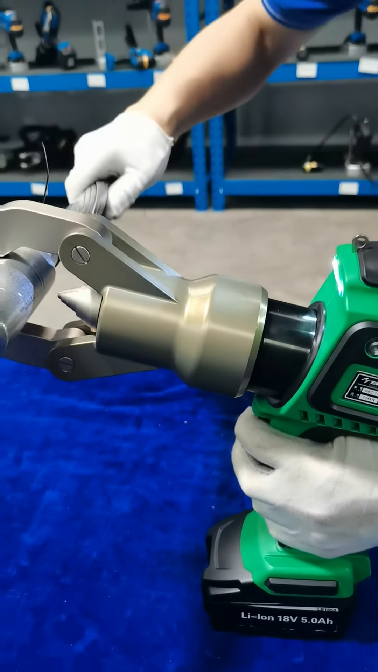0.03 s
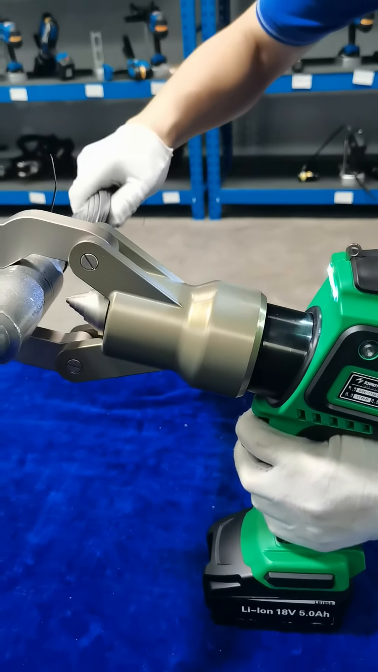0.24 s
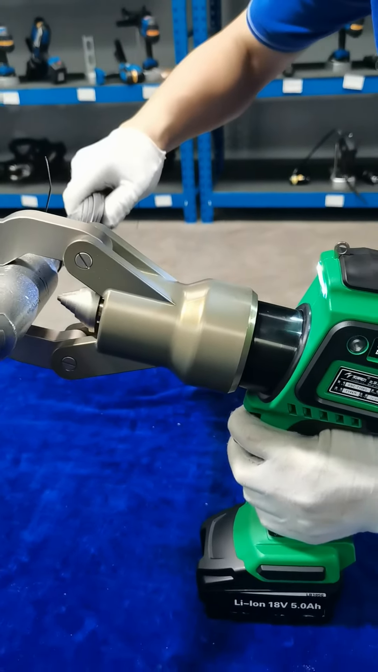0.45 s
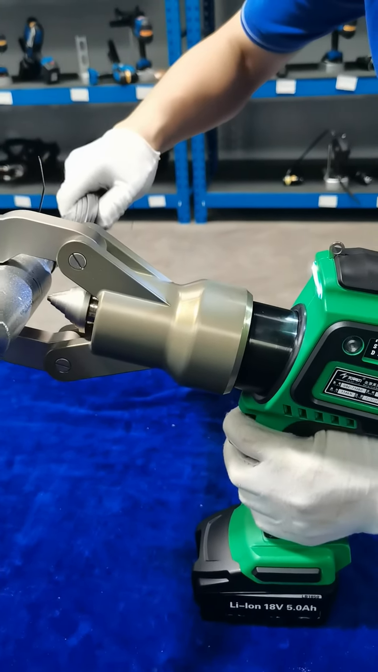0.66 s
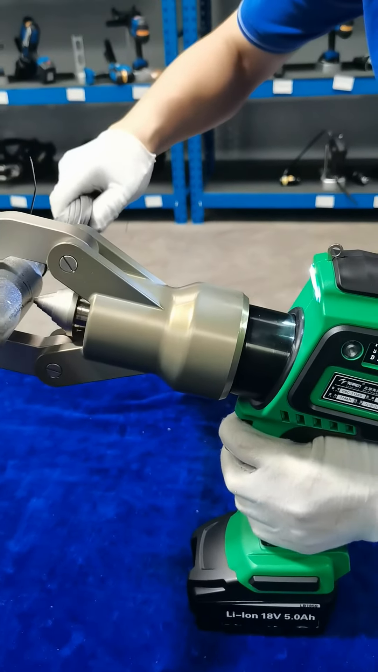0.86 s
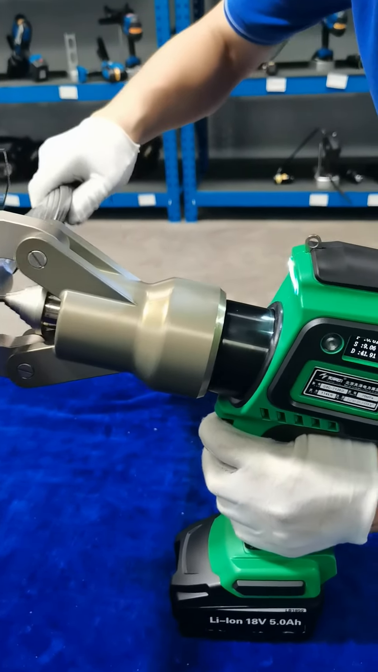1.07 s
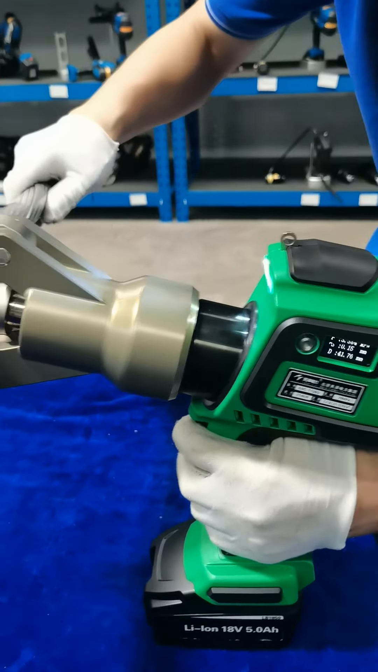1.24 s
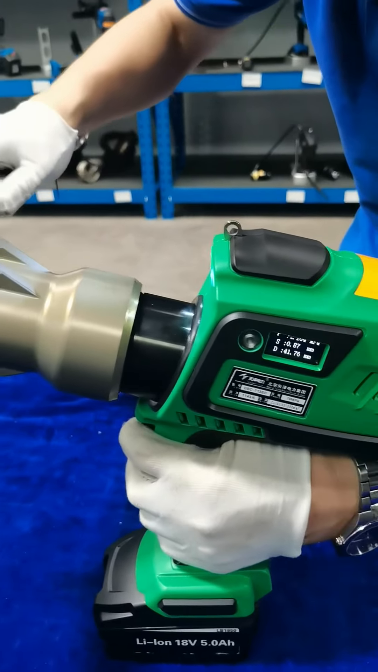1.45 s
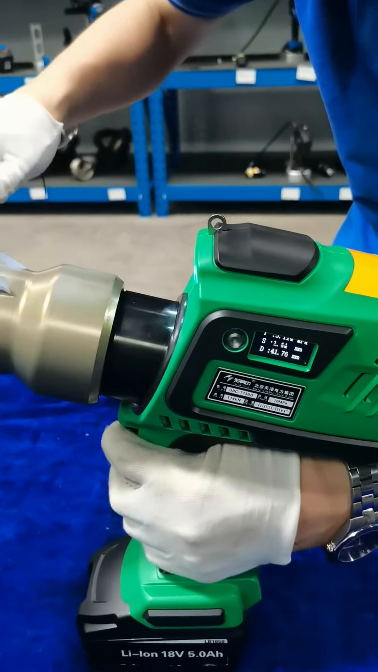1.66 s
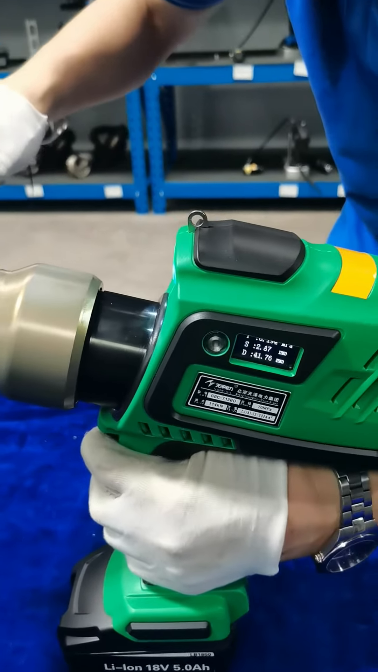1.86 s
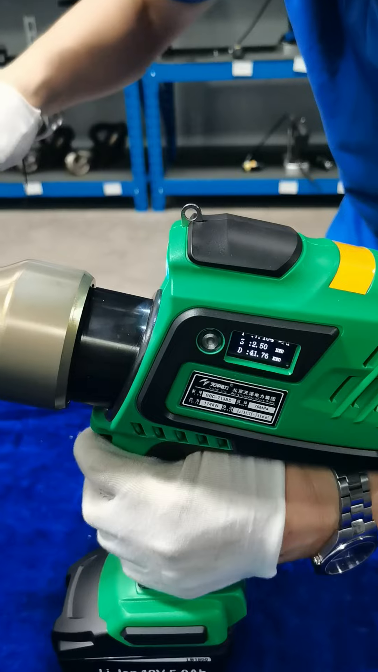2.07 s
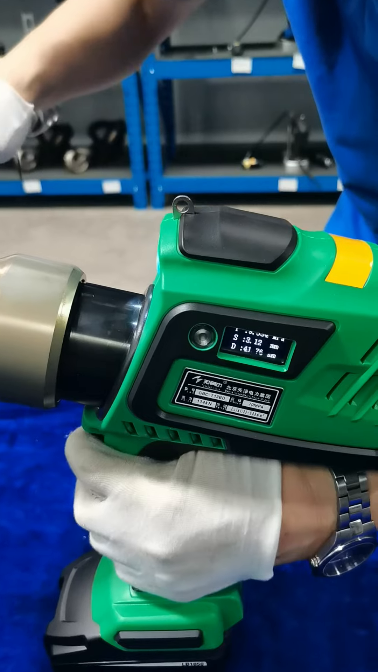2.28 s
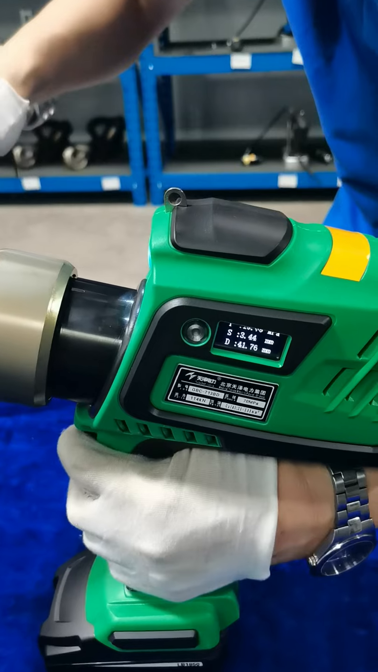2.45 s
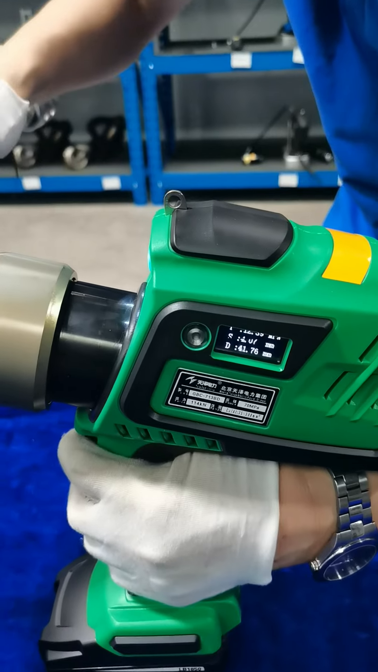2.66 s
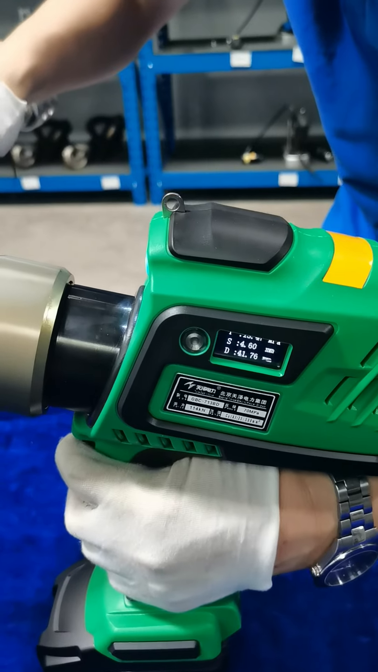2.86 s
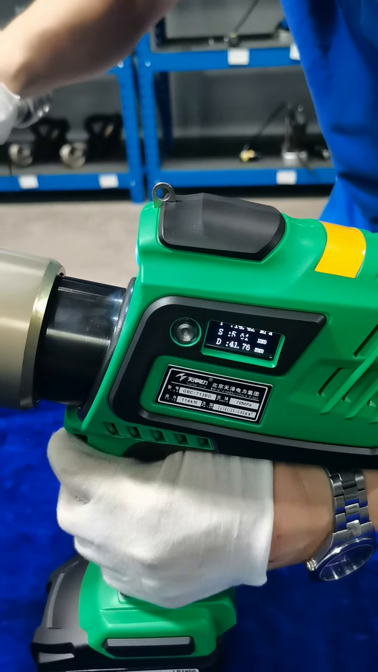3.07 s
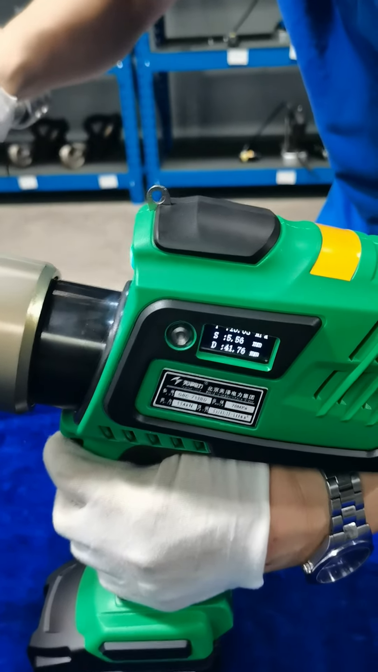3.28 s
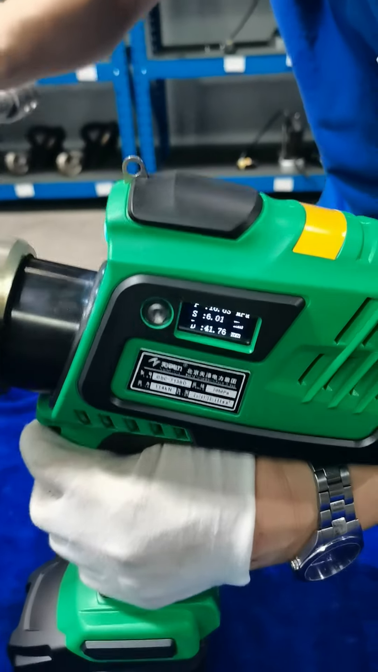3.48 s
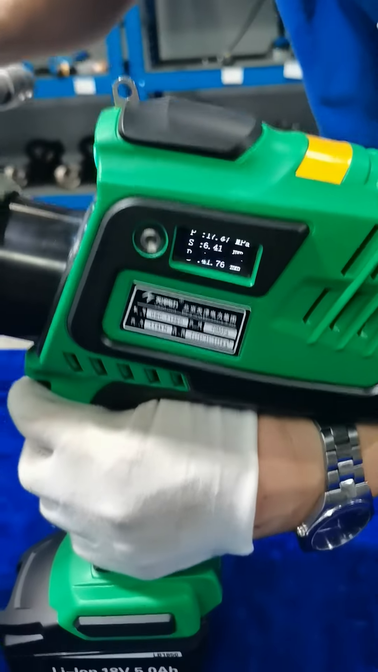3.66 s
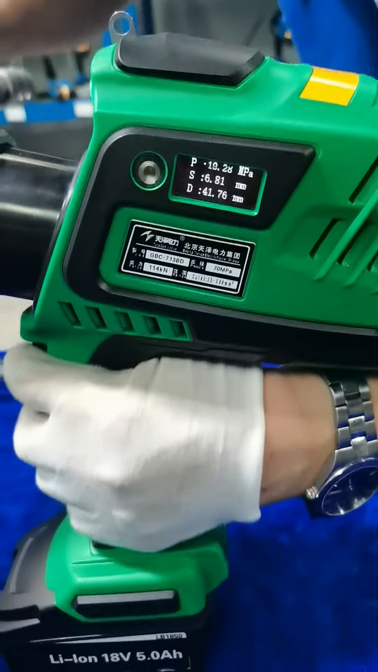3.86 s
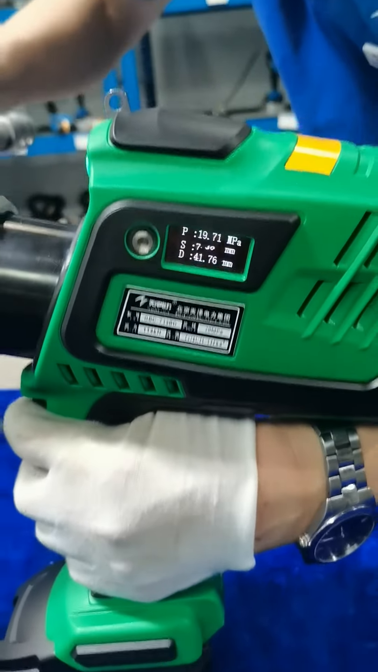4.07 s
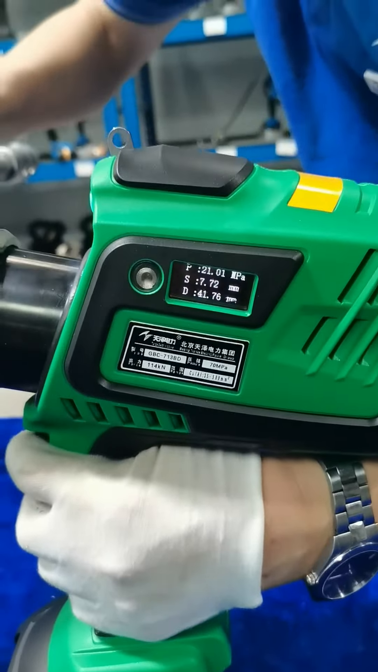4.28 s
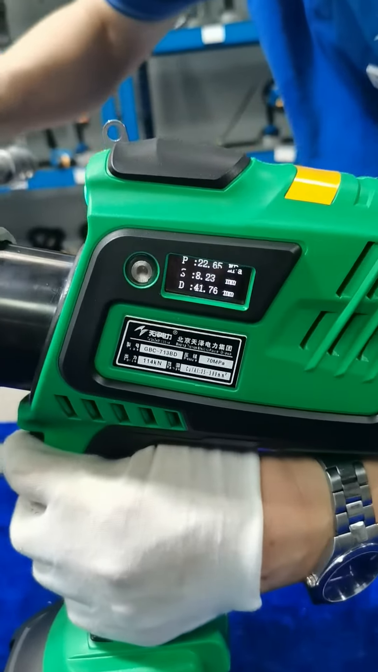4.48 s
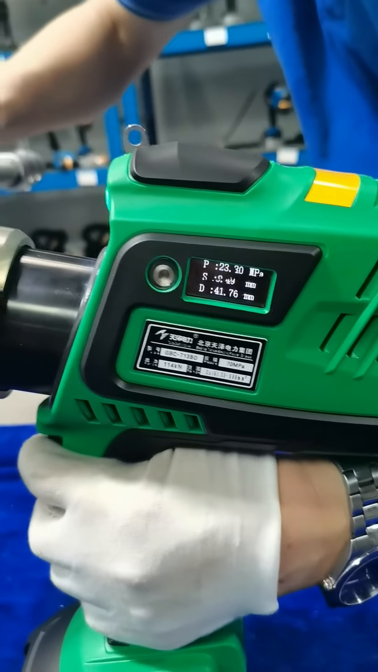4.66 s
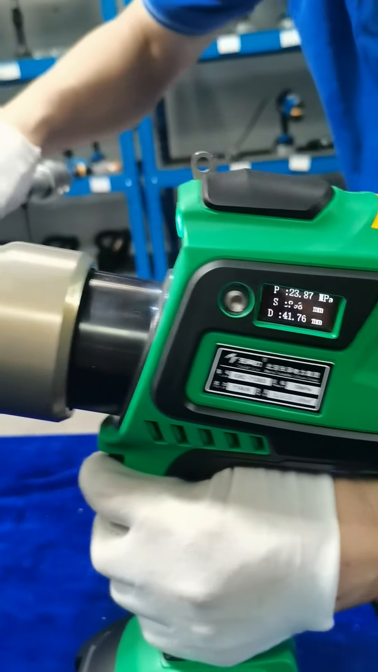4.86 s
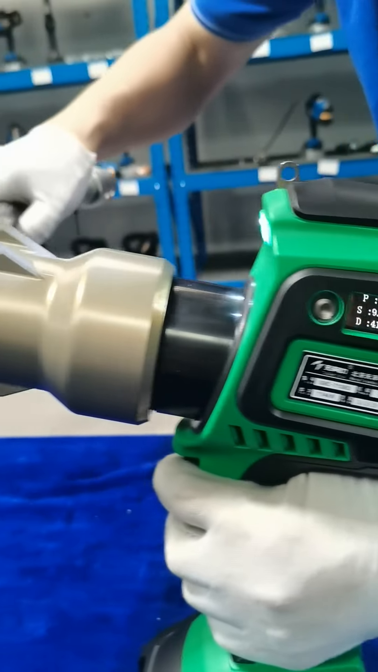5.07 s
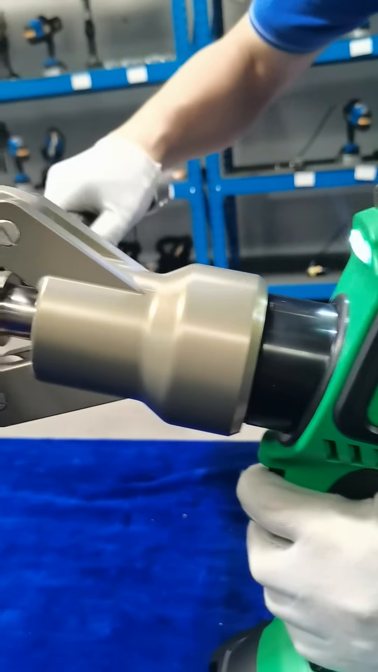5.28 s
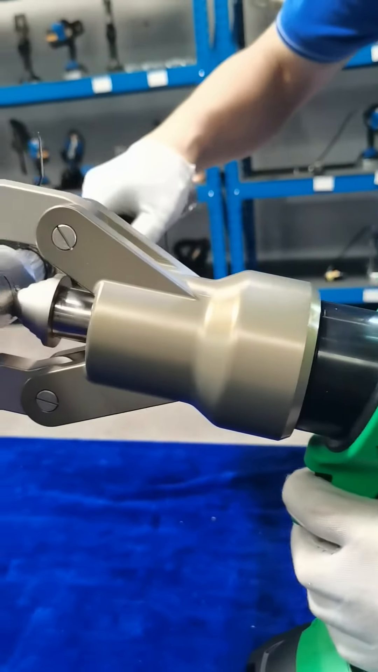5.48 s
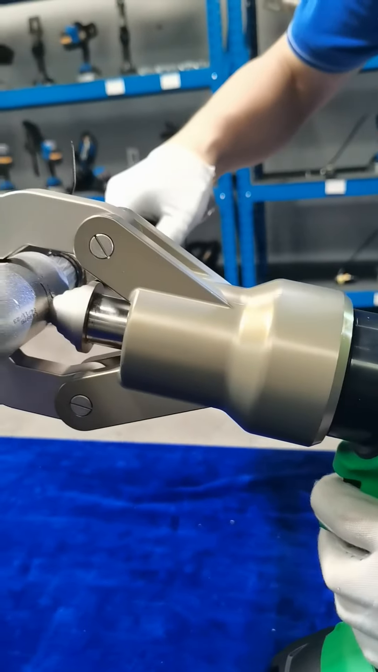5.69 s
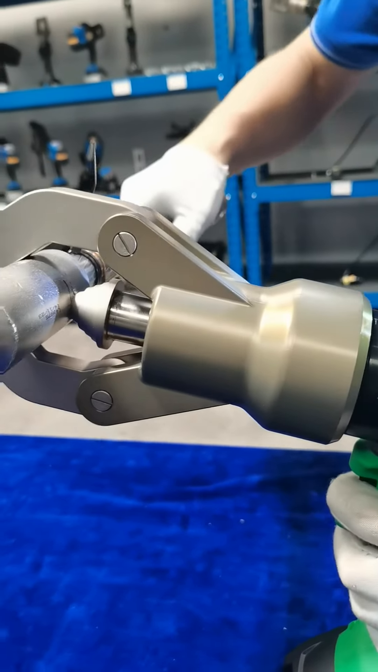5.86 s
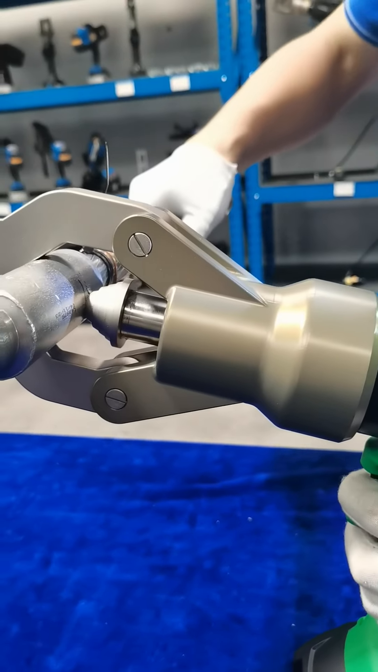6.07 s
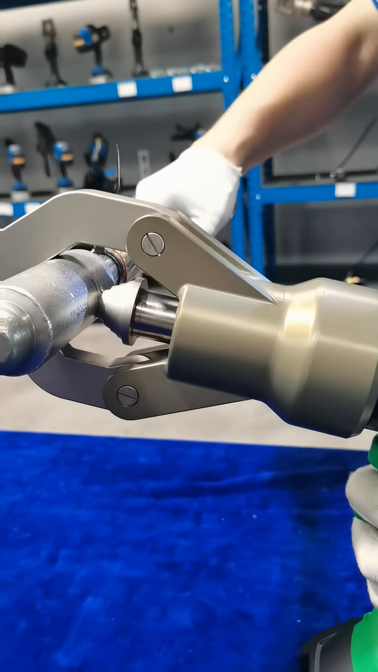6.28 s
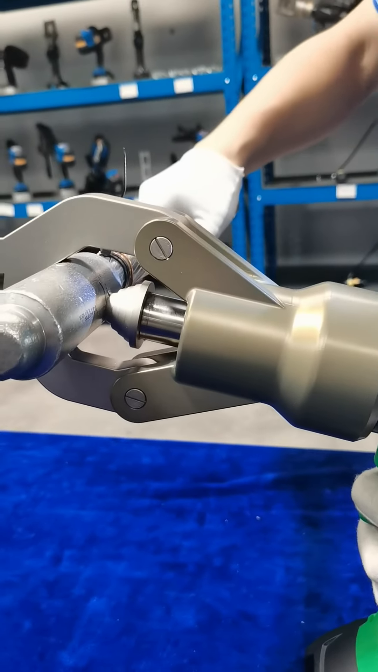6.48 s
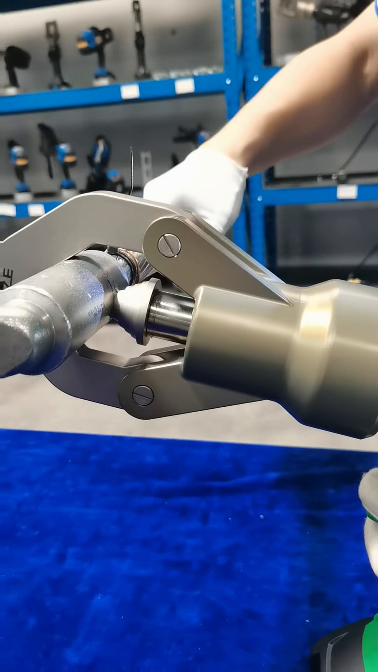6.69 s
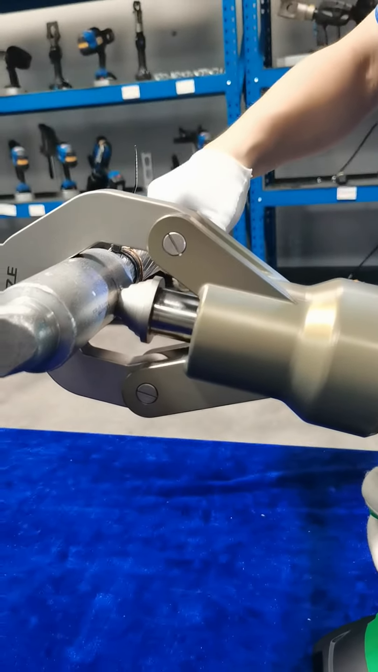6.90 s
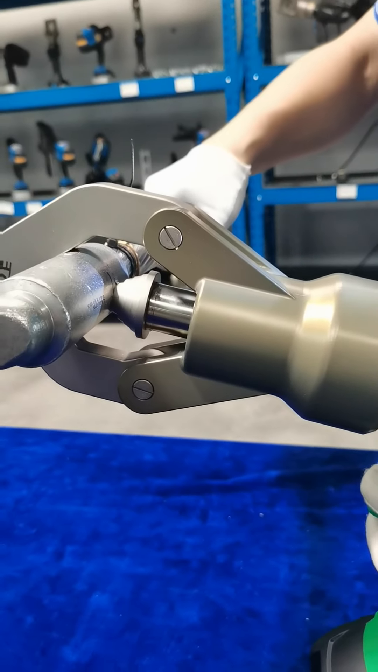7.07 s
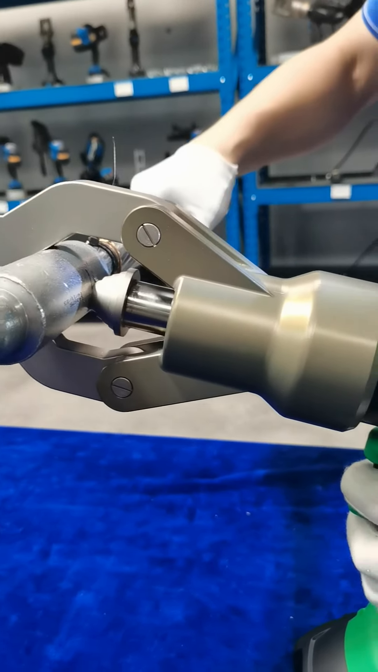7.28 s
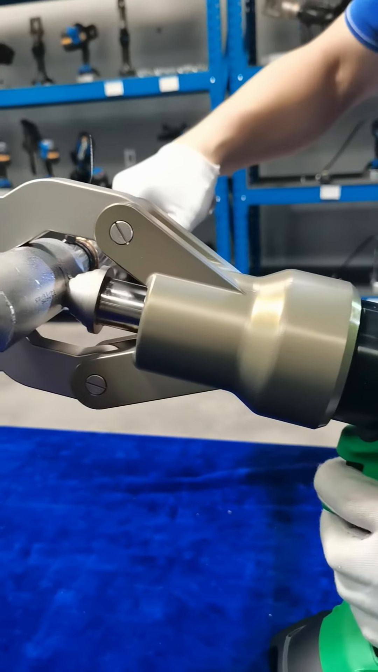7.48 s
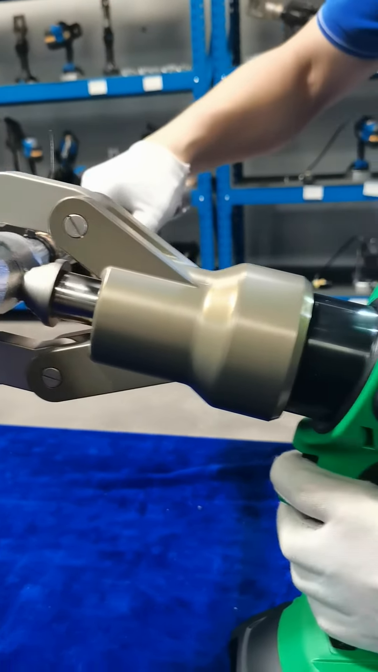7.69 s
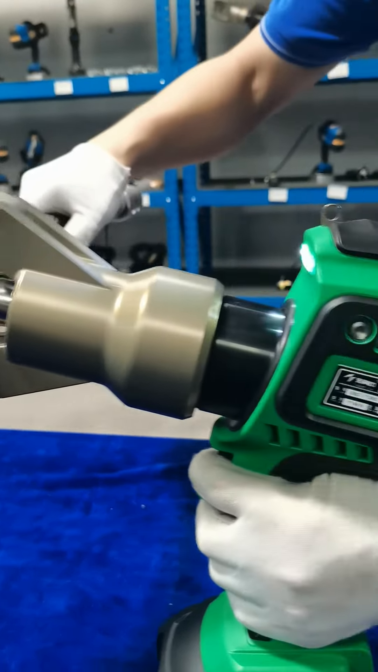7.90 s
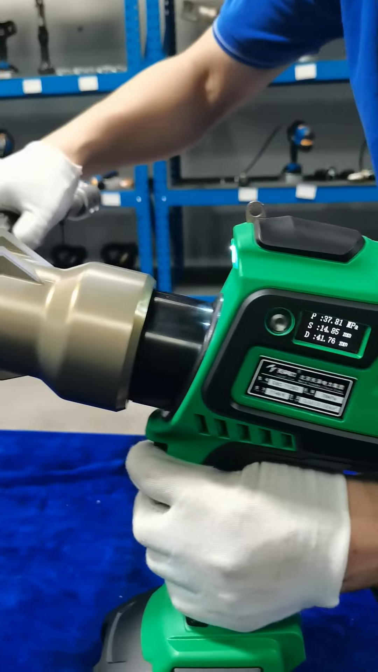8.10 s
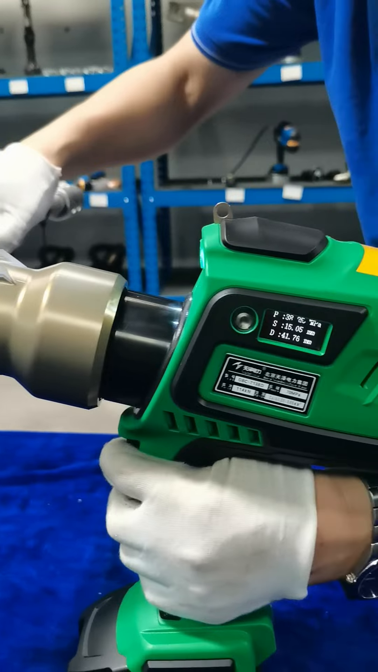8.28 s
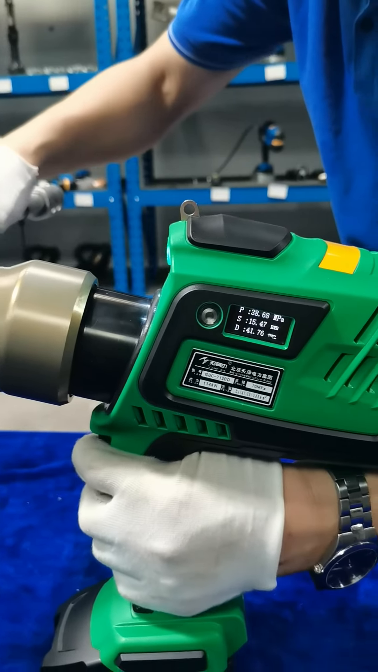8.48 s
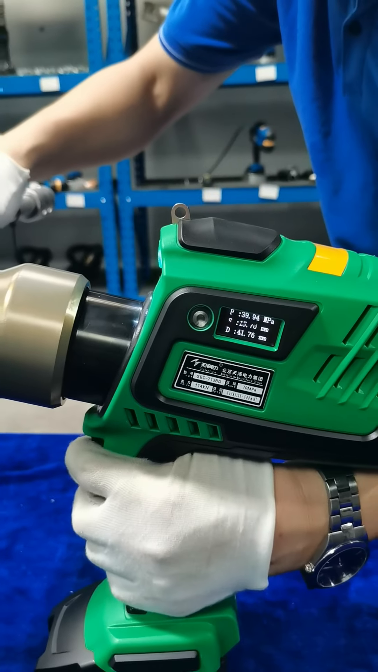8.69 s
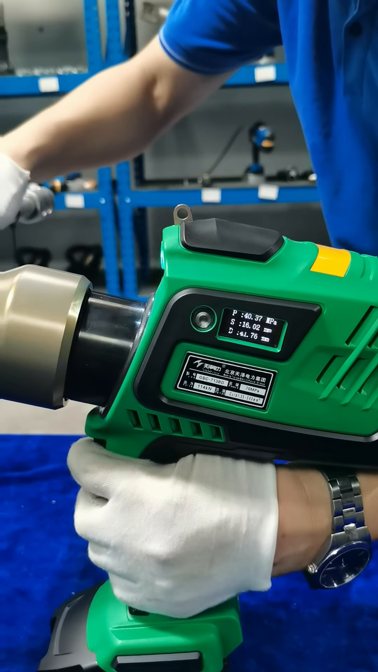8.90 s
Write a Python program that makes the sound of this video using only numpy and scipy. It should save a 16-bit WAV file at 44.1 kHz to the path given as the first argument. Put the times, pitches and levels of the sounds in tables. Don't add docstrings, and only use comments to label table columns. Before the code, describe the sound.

In a hard-walled workshop with low rumble, a soft trigger tick leads to a short rough metallic ring, then a battery hydraulic tool races up to a piercing whine. Pump strokes make it flutter about sixteen times a second, shallow at first, then deeper and grittier as pressure rises. Close microphone, short room echo, slight handling thumps; the motor is still running at the end.

```python
import sys
import numpy as np
from scipy import signal
from scipy.fft import rfft, irfft
from scipy.io import wavfile
from scipy.ndimage import uniform_filter1d

SR = 44100
rng = np.random.default_rng(int(sys.argv[2]) if len(sys.argv) > 2 else 0)


def to_wav(sig):
    pcm = np.clip(np.atleast_2d(sig), -1, 1) * 32767
    pcm = np.round(pcm).astype(np.int16)
    wavfile.write(sys.argv[1], SR, pcm.T)


def convert_level_to_amplitude(level_db):
    exponent = np.asarray(level_db, float) / 20
    return 10 ** exponent


N = 394254
TIME = np.arange(N) / SR
WHINE_MULTIPLE = 8

# [t/s, share of free speed 0-1, whine gain level/dB]
RUN_UP = [
    (.258, 0.02, -79),
    (.3, 0.14, -59),
    (.345, 0.44, -22),
    (.365, 0.53, -12),
    (.39, .6, -25),
    (.43, .69, -15),
    (.468, .81, -9),
    (.485, 0.94, -2),
    (.5, .95, 6),
]
# [t/s, free turns per second f/Hz, sag of the speed in a stroke 0-1]
SPEED = [(.5, 329.5, .045), (1.2, 329.5, .048), (1.9, 327.5, .058), (2.5, 327, .078), (3.0, 326.5, .11),
         (3.5, 326, .14), (4.0, 326, .158), (4.8, 326.5, .172), (5.4, 326, .2), (6, 325.5, .235),
         (7.4, 327.5, .25), (8.0, 327.5, .28), (8.94, 328.5, .28)]


def rms_one(x):
    return x / np.sqrt(np.mean(np.abs(x) ** 2) + 1e-20)


def in_time(rows):
    s, *columns = np.transpose(rows)
    return [np.interp(TIME, s, c) for c in columns]


def fades(events):
    coarse = TIME[::32]
    total_db = sum(gain_db * np.exp(-((coarse - s) / half_s) ** 4) for s, half_s, gain_db in events)
    return np.interp(TIME, coarse, total_db)


def slow(hz):
    r = np.exp(-2 * np.pi * hz / SR)
    settle = 9000
    wander = signal.lfilter([1], [1, -2 * r, r * r], rng.standard_normal(N + settle))
    return rms_one(wander[settle:])


def coloured(points):
    hz = np.maximum(np.fft.rfftfreq(N, 1 / SR), 1)
    point_hz, point_db = np.transpose(points)
    level_db = np.interp(np.log(hz), np.log(point_hz), point_db, left=-90, right=-90)
    return rms_one(irfft(rfft(rng.standard_normal(N)) * convert_level_to_amplitude(level_db), N))


def resonance(x, hz, width_hz):
    r = np.exp(-np.pi * width_hz / SR)
    top = np.array([1, 0, -1]) * (1 - r * r) / 2
    return signal.lfilter(top, [1, -2 * r * np.cos(2 * np.pi * hz / SR), r * r], x)


def twice(x, hz, width_hz):
    return rms_one(resonance(resonance(x, hz, width_hz), hz, width_hz))


def tone(turns, waver_hz, rough):
    rough = np.clip(rough, 0, 1)
    scatter = (slow(waver_hz) + 1j * slow(waver_hz)) / np.sqrt(2)
    wobble = np.sqrt(1 - rough) + np.sqrt(rough) * scatter
    return np.real(wobble * np.exp(2j * np.pi * turns))


def background():
    # [f/Hz, level/dB per Hz]
    rumble_colour = [(20, -30), (32, -15), (45, -2), (55, 5), (70, -3), (105, -4.5), (130, -10),
                     (190, -13.5), (260, -3)]
    # [f/Hz, level/dB per Hz]
    air_colour = [(220, 6), (500, -16), (1200, -20), (4000, -30), (8500, -42), (11000, -30), (15000, -27)]
    # [f/Hz, waver f/Hz, level/dB]
    room_tones = [
        (197, 6.7, -52),
        (810, 42, -66),
    ]
    # [t/s, half length t/s, rumble gain level/dB]
    handling = [
        (0.01, 0.058, 2),
        (.42, 0.088, 11),
        (1.1, 0.083, 10),
        (2.66, 0.085, 5),
        (5.2, .15, 6),
        (5.85, 0.088, 7),
        (6.35, 0.081, 5),
        (7.7, 0.27, 3.5),
        (4.4, 0.26, -10),
    ]
    rumble_db = -53.5 + 4.5 * np.tanh(slow(2.4)) + fades(handling)
    out = convert_level_to_amplitude(rumble_db) * coloured(rumble_colour) + convert_level_to_amplitude(-60.5) * coloured(air_colour)
    duck_db = -5 * in_time(RUN_UP)[0]
    for hz, waver_hz, level_db in room_tones:
        out += convert_level_to_amplitude(level_db + duck_db) * tone(hz * TIME, waver_hz, rough=0.69)
    return out


def workshop(x):
    t60_s = 0.5
    age = TIME[:SR // 2]
    echoes = rng.standard_normal(len(age)) * convert_level_to_amplitude(-60 * age / t60_s) * (age > .004)
    return signal.fftconvolve(x, echoes / np.sqrt(np.sum(echoes ** 2)))[:N]


def start_up():
    bites_s, attack_s = 0.2646, 0.0075
    lets_go_s, release_db_per_s = 0.41, 600
    tick_s, tick_length_s, tick_db = .09, .008, -54
    white = rng.standard_normal(N)
    held = np.clip((TIME - bites_s) / attack_s, 0, 1)
    held = held * convert_level_to_amplitude(-27.5 - np.clip(release_db_per_s * (TIME - lets_go_s), 0, 100))
    clutch = held * twice(white, 2420, 380)
    bright = twice(white, 6600, 1800) + 0.7 * twice(white, 10200, 1200)
    tick = convert_level_to_amplitude(tick_db) * np.exp(-((TIME - tick_s) / tick_length_s) ** 2) * bright
    return clutch + tick


def housing(x):
    # [f/Hz, width f/Hz, boost level/dB]
    shell_modes = [(1504, 140, 6), (2225, 700, 2), (2257, 16, 5.5), (2303, 116, -11), (2675, 110, -3.5),
                   (3020, 92, 7.5), (3686, 110, 4.5), (4217, 247, 5.5), (6260, 210, 2), (7630, 196, 8),
                   (8110, 180, 4), (9230, 470, -3.5), (9960, 610, 6.5), (11700, 550, 5)]
    for hz, width_hz, boost_db in shell_modes:
        x = x + (convert_level_to_amplitude(boost_db) - 1) * resonance(x, hz, width_hz)
    return x


def piston_load():
    # [t/s, strokes done]
    pump = [(.507, 0), (1.287, 13), (1.459, 16), (1.938, 24), (2.371, 31), (2.676, 36), (3.67, 52),
            (4.18, 60), (4.687, 68), (6.235, 92), (7.282, 108), (8.611, 128), (9.007, 134)]
    strokes = np.interp(TIME - .002, *np.transpose(pump))
    return np.sin(np.pi * strokes) ** 2


def many_modes(x, ripple_db, spacing_hz):
    hz = np.arange(N // 2 + 1) * SR / N
    ripple = np.interp(hz / spacing_hz, np.arange(600), rng.standard_normal(600))
    crowded = np.clip(hz / 4500, .25, 1)
    return rms_one(irfft(rfft(x) * convert_level_to_amplitude(ripple_db * ripple * crowded), N))


def gears(load):
    # [f/Hz, level/dB per Hz]
    gear_colour = [(300, -18), (520, -9), (700, 0.5), (1150, 7), (1900, -4), (2400, 5.5), (2800, -8.5),
                   (4150, 1.5), (4900, -1.5), (7700, -2), (8900, -10), (10300, -7), (13000, -13.5),
                   (15750, -5.5)]
    # [t/s, level/dB]
    nearness = [(.5, -2), (.7, -3.5), (1.4, -1.5), (2.6, 1.5), (3.4, 1.5), (3.8, 3.5), (4.6, 4), (5.0, 2.5),
                (5.4, 0), (7.8, 0.5), (8.2, 2.5), (8.94, 3)]
    # [level/dB, share of nearness, level/dB per unit of sag, power of run-up speed]
    gear_ranges = [(-33.5, 0.13, -12.5, 1.02), (-31, 0.18, 5.5, 0.67), (-26.5, 0.97, -4.7, 1.2)]
    # (low Hz, high Hz, gain dB, swell dB)
    bands = [(253.0, 1027, 4.0, 1.1), (1530, 3760, 3.5, 10.0), (5060, 20200, 0.0, 4.3)]
    near_db = in_time(nearness)[0]
    sag = in_time(SPEED)[1]
    speed_db = 20 * np.log10(np.clip(in_time(RUN_UP)[0], .01, 1))

    short = np.clip(2.6 - 9.5 * sag, 1, 3)
    engaged = np.tanh(2.0 * load ** short) - 1.02 * sag * load ** 4
    push = (engaged - .5) * np.clip((sag - .03) / 0.043, 0, 1)

    facing = 1.31 * slow(0.65)
    noise = np.cos(facing) * many_modes(coloured(gear_colour), 5, 110)
    noise += np.sin(facing) * many_modes(coloured(gear_colour), 5, 110.6)
    noise *= convert_level_to_amplitude(2.13 * slow(1300))

    out = 0
    for (db, share, per_sag_db, power), (low_hz, high_hz, gain_db, swell_db) in zip(gear_ranges, bands):
        level_db = db + share * near_db + per_sag_db * sag + power * speed_db
        band_pass = signal.butter(2, [low_hz, high_hz], "band", fs=SR, output="sos")
        band = rms_one(signal.sosfilt(band_pass, noise))
        out = out + convert_level_to_amplitude(level_db + gain_db + swell_db * push + 1.32 * slow(31)) * band
    return out * (TIME > RUN_UP[0][0])


def whine(turns, load, speed, sag, slack, braking):
    # [t/s, free level/dB, braked level/dB]
    whine_levels = [(.53, -13, -11.5), (.66, -5.5, -16.5), (.85, -8.5, -19), (1.05, -6.5, -23),
                    (1.22, -4.5, -52), (1.36, -14, -11.5), (1.85, -25, -11.5), (2.1, -8, -18),
                    (2.4, -7, -24), (2.63, -12.5, -17.5), (3.2, -10.5, -19), (3.65, -15.5, -18),
                    (3.95, -14, -26.5), (4.75, -14, -20), (5.5, -18, -25.5), (6.9, -18.5, -27.5),
                    (7.7, -15.5, -29), (8.94, -14, -23.5)]
    # [t/s, half length t/s, gain level/dB]
    echo_fades = [(1.4, 0.031, -7), (1.77, 0.1, -23), (2.308, .03, -5.5), (2.433, .03, -11),
                  (2.676, .03, -9), (3.36, 0.031, -6), (4.181, 0.023, -4), (5.229, .06, -4),
                  (5.649, 0.11, -5), (5.976, 0.1, 4), (6.105, 0.029, -7), (6.2, .06, -1),
                  (6.495, 0.076, -16), (7.09, 0.12, -14), (7.282, 0.029, -9), (7.546, .03, -9),
                  (8.011, .03, -6), (8.077, .03, 4), (8.209, .09, -0.5), (8.343, 0.027, 3.5),
                  (8.48, .03, -9)]
    free_db, braked_db = in_time(whine_levels)
    braked_db = braked_db + 5 * np.clip(1 - sag / 0.16, -.5, 1) * (.5 - braking ** 2)
    edge_loss_db = 6 * np.minimum(load / slack, 2) ** 2 * np.clip(sag / .15, 0, 1)
    free_db = free_db + fades(echo_fades) - edge_loss_db

    off_peak = np.clip(sag * braking / 0.048 + 13.0 * (1 - speed), 0, 1)
    strain = np.clip(4.2 * sag - .1 + 1.5 * (1 - speed), 0, .7)
    phase = WHINE_MULTIPLE * turns
    clean = convert_level_to_amplitude(free_db) * np.cos(np.pi / 2 * off_peak) * tone(phase, 38, rough=0.037)
    beating = np.sqrt(1 - strain) * tone(phase, 55, rough=0.49)
    broken = np.sqrt(strain) * tone(phase, 120, rough=1)
    return clean + convert_level_to_amplitude(braked_db) * np.sin(np.pi / 2 * off_peak) * (beating + broken)


def shaft_hum(turns, braking):
    # [t/s, level/dB]
    hum_levels = [(.3, -42), (.5, -36), (1.55, -37), (1.9, -31.5), (2.3, -30.5), (2.8, -38), (3.3, -32),
                  (4.1, -33), (5.4, -39.5), (6, -35.5), (8.4, -34), (8.94, -33.5)]
    hum_db = in_time(hum_levels)[0]
    hum = convert_level_to_amplitude(hum_db - 3.0 + 4.9 * braking) * tone(turns, 24.7, rough=.4)
    return hum + (convert_level_to_amplitude(2.5) - 1) * resonance(hum, 285.4, 15)


def weaker_multiples(turns, load, speed, sag, start_db):
    # [multiple of the shaft rate, level/dB, waver f/Hz, roughness 0-1, gain when braked level/dB]
    shaft_orders = [(3.998, -28, 37, 0.38, -6.5), (5.72, -41, 100, 1, -7), (11.56, -46, 80, 1, 19),
                    (16.38, -50.5, 300, 0.99, 13), (22.98, -41.5, 700, 1, 7.5), (31.7, -66, 250, 1, 1),
                    (34.5, -48.5, 160, 0.94, 13.5), (43.4, -53, 440, 0.8, 16)]
    pressed = np.maximum(load * np.clip(sag / .08, 0, 1), np.minimum(5 * (1 - speed), 1))
    out = np.zeros(N)
    for multiple, level_db, waver_hz, rough, braked_gain_db in shaft_orders:
        gain_db = level_db + 0.49 * start_db + braked_gain_db * pressed
        if multiple < WHINE_MULTIPLE:
            gain_db = gain_db - 24.5 * sag
        out += convert_level_to_amplitude(gain_db) * tone(multiple * turns, waver_hz, rough)
    return out


def motor(load):
    free_hz, sag = in_time(SPEED)
    speed, start_db = in_time(RUN_UP)
    speed = np.where(TIME > RUN_UP[-1][0], 1, np.minimum(speed, 1))

    slack = np.clip(.08 + 1.15 * sag, 0, .6)
    braking = np.clip((load - slack) / (1 - slack), 0, 1)
    braking = uniform_filter1d(braking ** (1.45 - 3.4 * sag), size=220)

    sagging = 1 - sag * braking * (1 + .06 * slow(14))
    shaft_hz = free_hz * speed * sagging * (1 + .002 * slow(12))
    turns = np.cumsum(shaft_hz) / SR

    out = convert_level_to_amplitude(start_db) * whine(turns, load, speed, sag, slack, braking)
    out += shaft_hum(turns, braking)
    out += weaker_multiples(turns, load, speed, sag, start_db)
    return out * (TIME > RUN_UP[0][0])


def scene():
    load = piston_load()
    tool = housing(motor(load) + gears(load)) + start_up()
    return (tool + convert_level_to_amplitude(-8) * workshop(tool) + background())[None]


def top_cut(x):
    return signal.sosfilt(signal.butter(12, 15640, fs=SR, output="sos"), x)


def record(dry):
    rounded = 0.84 * np.tanh(dry / 1.207)
    low_pass = signal.cheby2(12, 60, 15760, fs=SR, output="sos")
    mix = signal.sosfilt(low_pass, rounded)
    return top_cut(mix)


dry = scene()
out = record(dry)
to_wav(out)
```